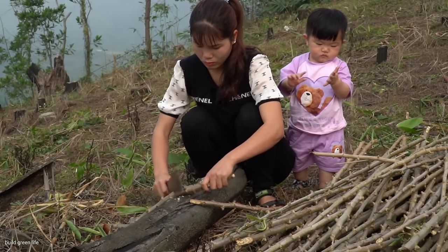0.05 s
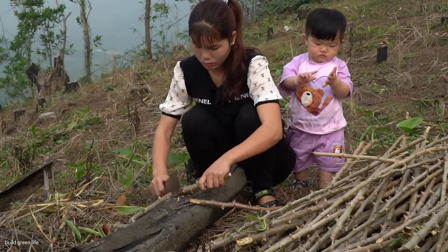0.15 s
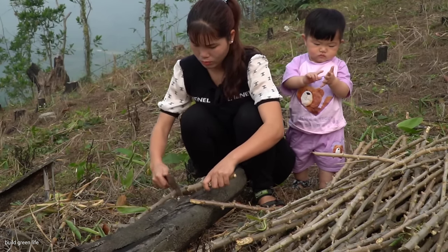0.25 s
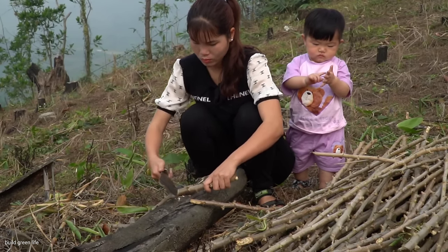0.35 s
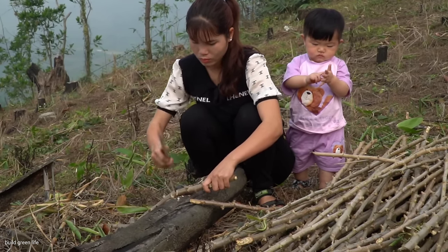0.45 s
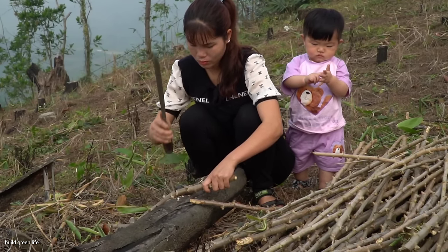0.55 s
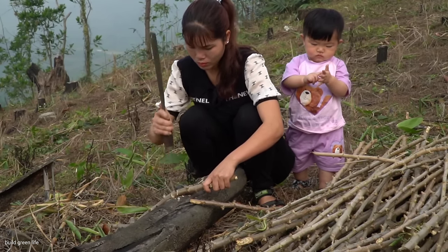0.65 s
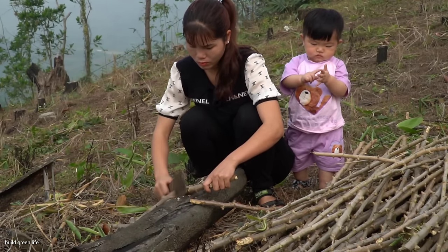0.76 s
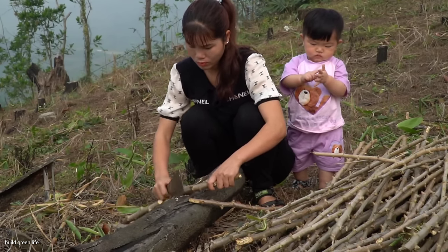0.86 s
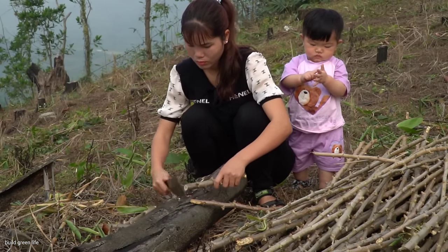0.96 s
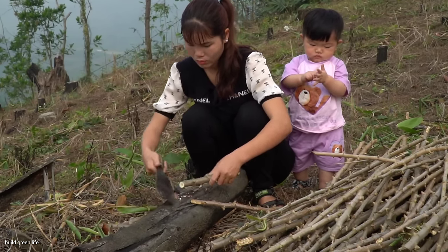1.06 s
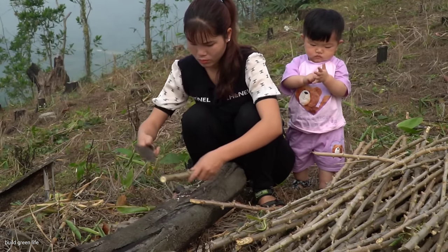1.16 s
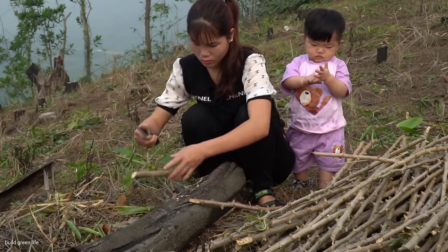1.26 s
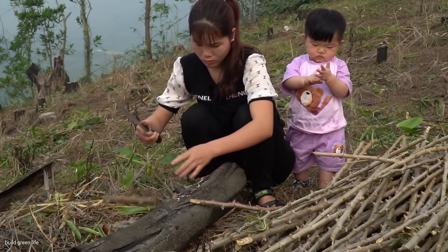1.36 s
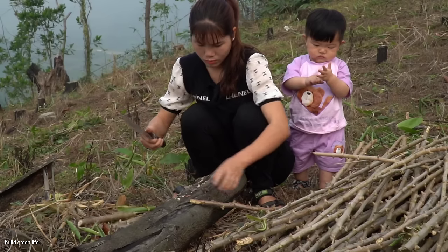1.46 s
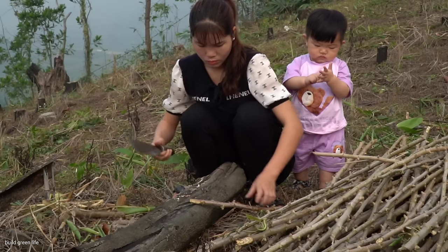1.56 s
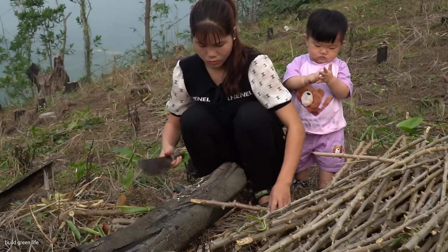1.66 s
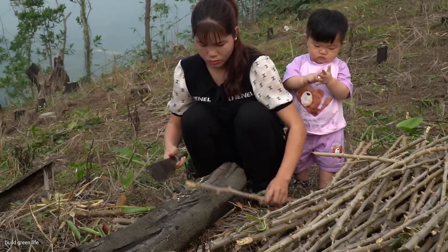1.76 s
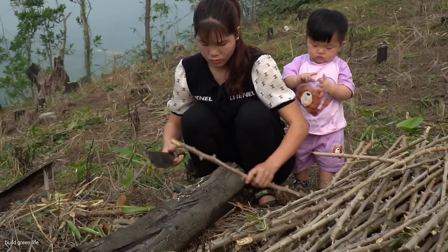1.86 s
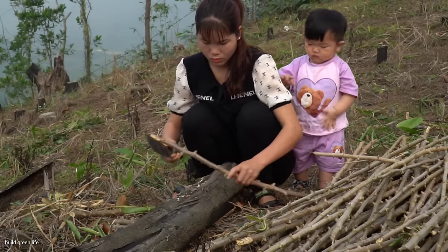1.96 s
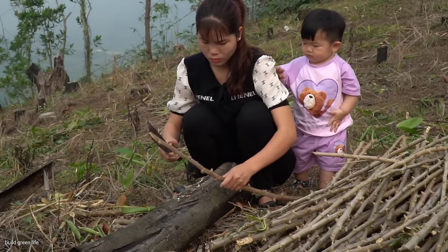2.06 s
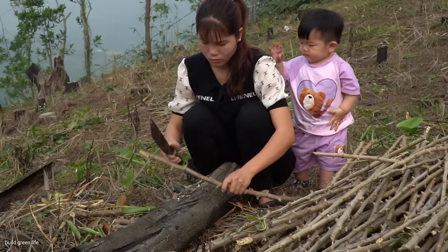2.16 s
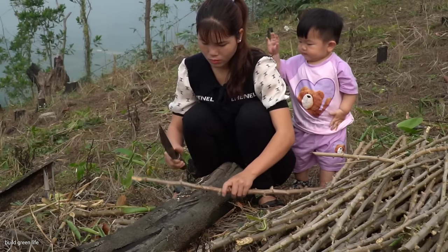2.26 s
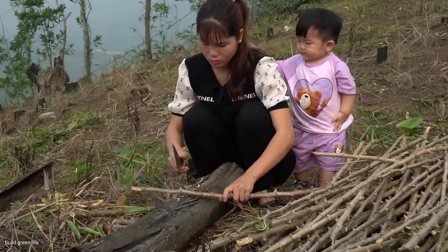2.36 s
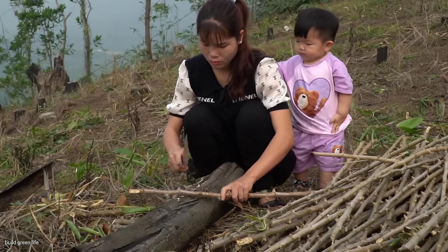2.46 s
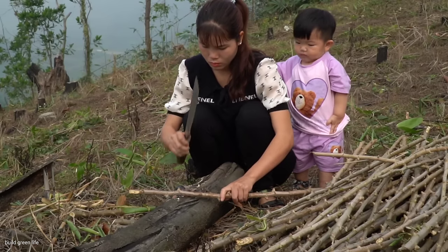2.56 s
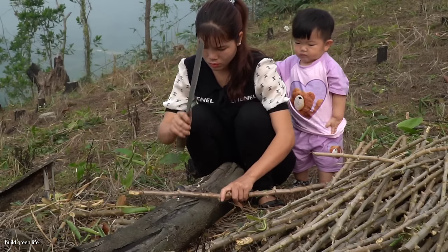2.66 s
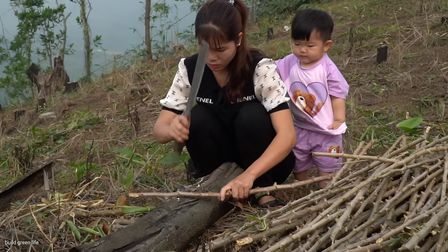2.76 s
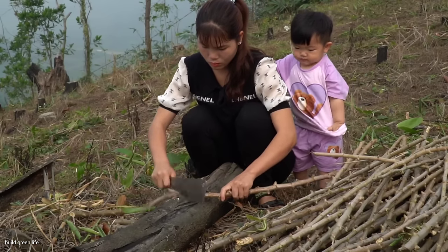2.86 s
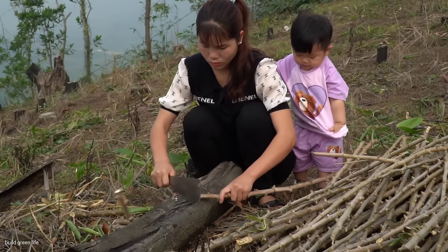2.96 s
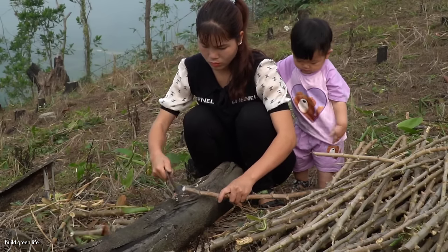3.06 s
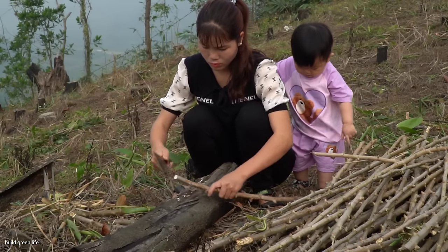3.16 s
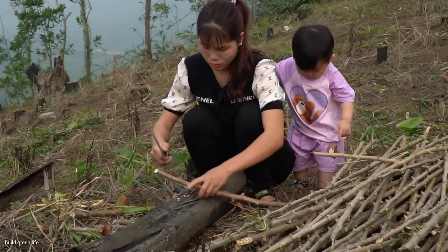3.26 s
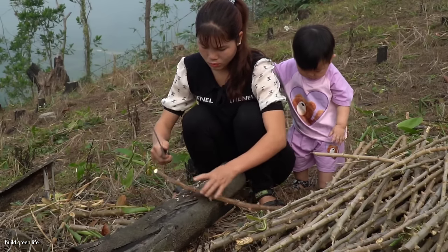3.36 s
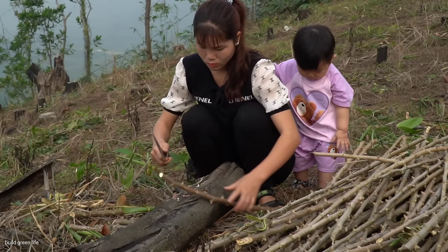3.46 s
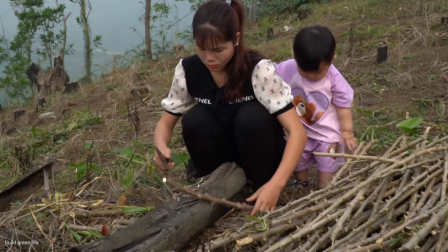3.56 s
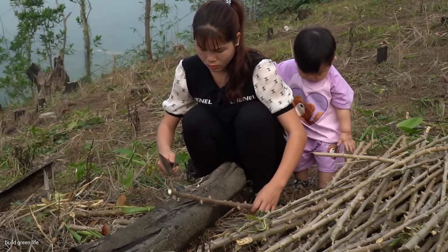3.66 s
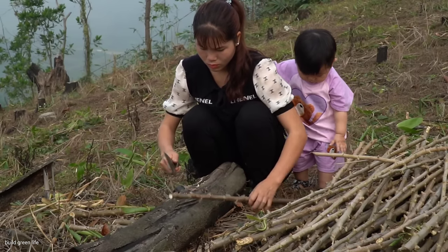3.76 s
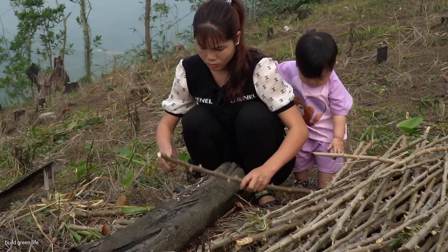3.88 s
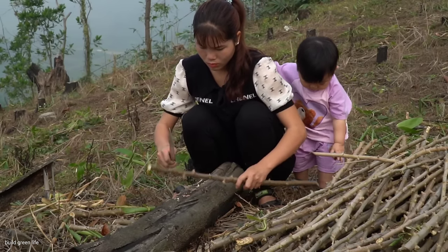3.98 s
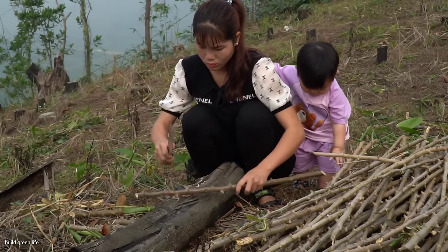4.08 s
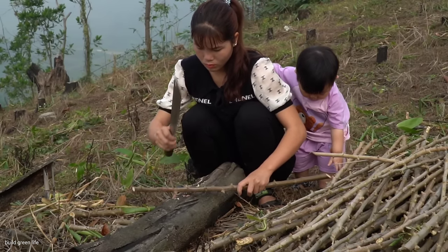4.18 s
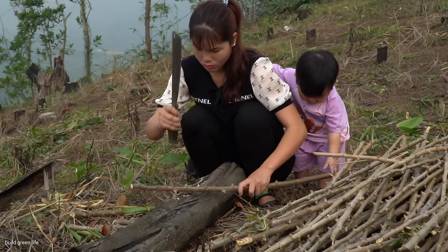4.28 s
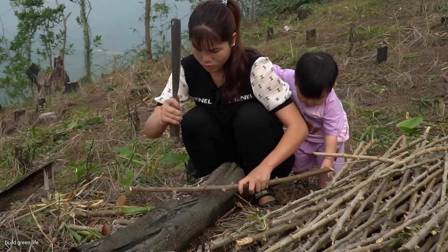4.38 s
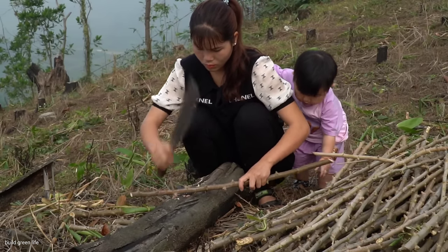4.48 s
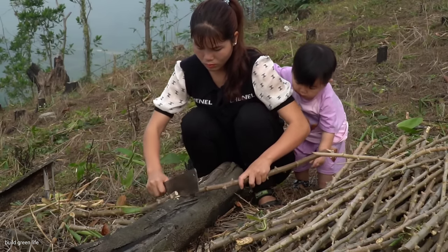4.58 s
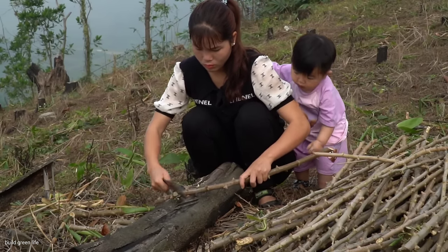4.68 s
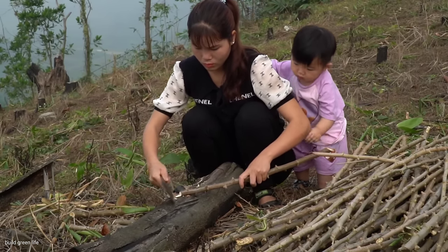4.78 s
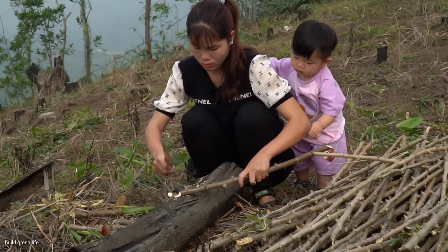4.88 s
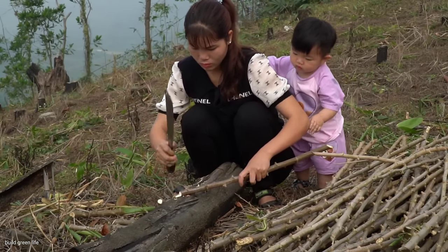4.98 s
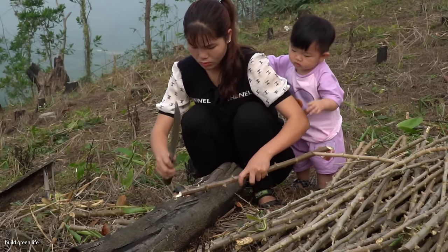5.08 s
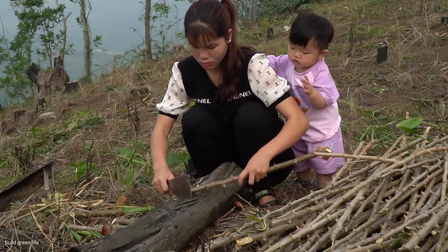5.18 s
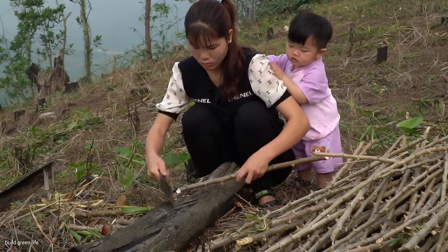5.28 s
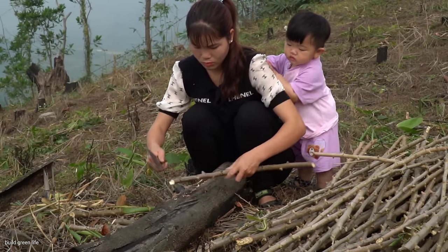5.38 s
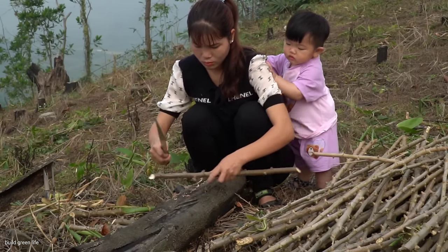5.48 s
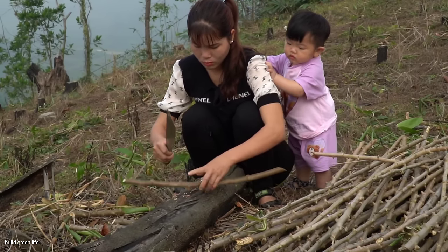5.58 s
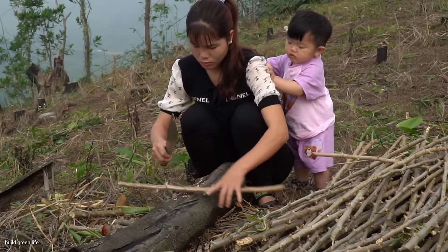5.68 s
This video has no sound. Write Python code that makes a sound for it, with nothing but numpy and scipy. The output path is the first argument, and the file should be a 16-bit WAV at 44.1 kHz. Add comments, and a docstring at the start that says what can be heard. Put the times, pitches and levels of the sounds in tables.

```python
"""An open hillside, where a machete chops woody stems on a log. Each stroke cracks through the stem,
rings the log and the blade, thuds through the soil and echoes off the slope. Between strokes bark tears,
wood knocks, a cut piece lands and dry litter rustles; a foot shifts at the end. Behind it all are air,
breeze, insects, birds, a low hum and a far engine revving. The microphone overloads on the strokes and
feeds only the left channel; the right carries faint hiss."""
import sys
import numpy as np
from scipy import signal
from scipy.fft import rfft, irfft, next_fast_len
from scipy.io import wavfile

SR = 44100
rng = np.random.default_rng(int(sys.argv[2]) if len(sys.argv) > 2 else 0)


def pcm_store(signal):
    """Save signal as 16-bit PCM."""
    levels = np.round(np.clip(np.atleast_2d(signal), -1, 1) * 32767)
    wavfile.write(sys.argv[1], SR, levels.astype(np.int16).T)


N = 252680
T = np.arange(N) / SR
AGE = T[:SR // 2]  # seconds since a hit


def undb(db):
    """Decibels to gain."""
    return 10 ** (np.asarray(db) / 20)


def add(track, start_s, sound):
    """Mix a sound in at start_s."""
    start = max(int(start_s * SR), 0)
    track[start:start + len(sound)] += sound[:max(N - start, 0)]


def spectral(x, gain):
    """Filter by a gain that is a function of frequency."""
    size = next_fast_len(len(x), real=True)
    return irfft(rfft(x, size) * gain(np.fft.rfftfreq(size, 1 / SR)), size)[:len(x)]


def equalise(x, eq):
    """Filter by a curve of (freq_hz, gain_db) points."""
    hz, db = np.transpose(eq)
    return spectral(x, lambda f: undb(np.interp(np.log(np.maximum(f, 1)), np.log(hz), db)))


def noise(eq, size=len(AGE)):
    """Coloured noise of rms 1."""
    x = equalise(rng.standard_normal(size), eq)
    return x / x.std()


def drift(rate_hz, size=len(AGE)):
    """Smooth random modulation of rms 1."""
    x = spectral(rng.standard_normal(size), lambda f: np.exp(-(f / rate_hz) ** 2))
    return x / np.sqrt(np.mean(x ** 2))


def crackle(eq, spread_db, rate_hz):
    """Noise broken into grains of uneven strength."""
    x = noise(eq) * undb(spread_db * np.clip(drift(rate_hz), -2, 2))
    return x / x.std()


def burst(rise_s, hold_s, t60_s):
    """Envelope that rises, holds and dies away."""
    return (1 - np.exp(-AGE / rise_s)) * np.exp(-np.log(1000) * np.maximum(AGE - hold_s, 0) / t60_s)


def ring(modes, pitch=1, length=1, scatter=0.0042):
    """Damped modes, each swelling to its peak as the vibration spreads; no two hits ring quite alike."""
    out = 0
    for hz, db, peak_s, t60_s in modes:
        decay_s = length * t60_s / np.log(1000)
        swell = np.exp((peak_s * np.log((AGE + 1 / SR) / peak_s) + peak_s - AGE) / decay_s)
        detuned_hz = hz * pitch * (1 + scatter * rng.standard_normal())
        out = out + undb(db) * swell * np.sin(2 * np.pi * detuned_hz * AGE)
    return out


# Tone of the open air: freq_hz, gain_db
AIR_EQ = [(25, -18), (50, -19), (70, 4.5), (150, 4.5), (300, -1.5), (600, -3), (950, -3), (1400, -9.5),
          (2500, -10.5), (3800, -13), (5200, -15), (7000, -20.5), (10000, -22), (16000, -28.5)]
# Fader ride on the air's midrange: time_s, level_db
AIR_RIDE = [(0.0, -49), (0.38, -51), (3.65, -52), (4.43, -54), (4.74, -51), (5.73, -50)]
# Partials of the low hum: pitch_hz, level_db
HUM_PARTIALS = [(49, -39), (106, -50.5), (212, -54), (265, -57.5)]

def hillside():
    """The bed: open air, a chorus of insects, a low hum and the breeze pressing on the microphone."""
    full_band_db = 10  # the whole band stands this far above its midrange
    air = noise(AIR_EQ, N) * undb(full_band_db + np.interp(T, *np.transpose(AIR_RIDE)) + 0.92 * drift(1.7, N))
    insect_hz, width_hz = 4514, 690
    chorus = drift(width_hz / 2, N) + 1j * drift(width_hz / 2, N)
    insects = np.real(chorus * np.exp(2j * np.pi * insect_hz * T)) * undb(-50.5 + 2.2 * drift(40, N))
    hum = sum(undb(db + 4.2 * drift(1.9, N)) * np.sin(2 * np.pi * hz * T) for hz, db in HUM_PARTIALS)
    breeze = noise([(1, -12.5), (4, -1.5), (8, -5), (16, -15), (30, -27.5), (80, -49), (400, -100)], N)
    gusts = undb(-23 + 2 * drift(1.3, N))
    return air + insects + hum + breeze * gusts


# Rev curve of the far engine: time_s, firing_hz
ENGINE_REVS = [(0.0, 145.4), (0.38, 115.1), (0.56, 79.1), (0.78, 121.8), (1.07, 85.5), (1.29, 77.4),
               (1.5, 104.8), (1.76, 108), (1.95, 77.5), (2.25, 111.6), (2.46, 84.3), (2.66, 80.65),
               (2.92, 109.1), (3.09, 107.7), (3.22, 76.6), (3.43, 78), (3.75, 119.0), (3.91, 87.0),
               (4.23, 75.9), (4.56, 101.4), (5.06, 97.3), (5.73, 137.6)]

def engine():
    """A far engine grows louder as it revs, up to full power; only its lowest harmonics carry."""
    full_power_hz, db_per_octave = 106.3, 16.5
    firing_hz = np.interp(T, *np.transpose(ENGINE_REVS))
    level_db = -41.5 + db_per_octave * np.minimum(np.log2(firing_hz / full_power_hz), 0)
    cycles = np.cumsum(firing_hz * (1 + 0.014 * drift(21.4, N))) / SR
    drone = sum(undb(db + 2.83 * drift(15.5, N)) * np.sin(2 * np.pi * k * cycles)
                for k, db in enumerate([2.5, -8.5, -15, -23], 1))
    return undb(level_db) * drone


# Crunch of the edge going in: freq_hz, gain_db
CRACK_EQ = [(60, -12), (230, -41), (480, 0), (800, -3), (1050, -3), (1500, -0.5), (2100, 0.5), (2600, -13),
            (5000, -16), (16000, -19)]
# Choked ring of a stem pinned on the log: pitch_hz, level_db, peak_s, t60_s
PINNED_STEM_MODES = [(571, -11.5, 0.0027, 0.012), (970, 0, 0.00061, 0.02), (1059, -9, 0.00074, 0.037),
                     (1375, -8, 0.00091, 0.035), (1567, -10, 0.00058, 0.022), (2030, -10.5, .0008, 0.022)]

def stem_crack(cut_s):
    """The edge crushes through the pinned stem, which rings briefly."""
    crush = noise(CRACK_EQ) * burst(0.0001, cut_s, 0.012)
    return undb(-2.5) * (crush + ring(PINNED_STEM_MODES, scatter=0.0078))


# Machete hits: start_s, log_db, log_pitch_ratio, log_length_ratio, crack_db, cut_s,
# splinter_db, splinter_t60_s, hollow_delay_s, rock_db, rock_delay_s, blade_db
STROKES = [(0.1230, -5, 1.005, 1.55, -2.5, 0.00094, -19, .05, .013, -23, 0.043, -47),
           (0.8494, -1.5, 0.96, 1.04, -2, 0.0013, -8, .01, .013, -12, 0.046, -60),
           (2.9432, -4, 1.024, 0.95, -3, 0.0039, -13.5, .022, .015, -26, 0.039, -41),
           (4.609, -9.5, 0.96, 0.97, -5.5, 0.0033, -7.5, 0.023, 0.00687, -30, 0.042, -37),
           (5.2412, -4, 0.97, .9, -8.5, 0.0014, -13.5, 0.016, 0.0016, -10.5, 0.019, -27)]
# Ringing layers of a hit: pitch_hz, level_db, peak_s, t60_s
LOG_MODES = [(516, -15.5, 0.0026, 0.021), (587, -8, 0.0019, 0.02), (644, -2, 0.0016, 0.052),
             (669.6, -13, 0.013, 0.054)]  # woody knock
HOLLOW_MODES = [(313.4, 0, 0.017, 0.068), (341.8, -17, 0.035, 0.1), (306.8, -20, 0.039, 0.21),
                (274, -19, 0.0079, 0.057), (381, -19, 0.014, 0.049)]  # the log's deep body
SOIL_MODES = [(46, 1, 0.1, 0.081), (47.83, -14.5, .28, 0.054)]  # sub thud
BLADE_MODES = [(1044, 2.5, 0.0024, 0.13), (2710, -11, .002, 0.14), (3040, -7.5, 0.0013, 0.14),
               (6900, -27, .001, .12), (9380, 5, 0.00069, 0.076), (9620, -16, .001, .12)]  # metallic ring
# Bright edge of splitting fibres: freq_hz, gain_db
FIBRE_EQ = [(200, -47), (1000, -6.5), (2100, 1.5), (3600, -7.5), (5400, 3.5), (7200, 0.5), (9500, 3.5),
            (13000, -5.5), (16000, -9)]

def chops():
    """The edge cuts the stem, then strikes the log; the slope echoes and the soil carries a late thud."""
    out = np.zeros(N)
    for (start_s, log_db, pitch, length, crack_db, cut_s,
         splinter_db, splinter_t60_s, hollow_delay_s, rock_db, rock_delay_s, blade_db) in STROKES:
        crack = undb(crack_db) * stem_crack(cut_s)
        grains = crackle(FIBRE_EQ, spread_db=6.5, rate_hz=3300)
        splinters = undb(splinter_db) * grains * burst(0.0002, cut_s, splinter_t60_s)
        # the log sounds only once the edge is through
        knock = undb(log_db) * np.pad(ring(LOG_MODES, pitch, length), (int(cut_s * SR), 0))[:len(AGE)]
        blow = crack + splinters + knock
        # the blade chatters in the cut as it rings
        blade = undb(blade_db + 5.9 * drift(160)) * ring(BLADE_MODES, scatter=0.00042)
        thud = undb(crack_db - 7) * ring(SOIL_MODES)
        add(out, start_s, blow + blade + thud)
        add(out, start_s, undb(-16.5) * signal.fftconvolve(blow, slope_echo()))
        # the hollow note builds after the blow, and again as the log rocks back
        add(out, start_s + hollow_delay_s, undb(-12 + 0.5 * log_db) * ring(HOLLOW_MODES, scatter=0.002))
        add(out, start_s + rock_delay_s, undb(rock_db) * ring(HOLLOW_MODES, pitch=1.02, scatter=0.0017))
        # the edge nicks the bark just before it bites
        add(out, start_s - .0012, undb(-16) * noise(FIBRE_EQ) * burst(0.00021, 0.0018, 0.0027))
    return out


# Tone of the echo return: freq_hz, gain_db
ECHO_EQ = [(100, -8), (350, -19), (650, -2.5), (1000, -2), (2000, -2.5), (2500, 0.5), (3100, 3.5),
           (4200, -12), (7000, -3.5), (16000, -11)]

def slope_echo():
    """Impulse response of the slope: the ground close by, the trunks a little later, a faint tail."""
    ground = burst(0.0043, 0.055, 0.15)
    trunks = undb(-3) * np.exp(-((AGE - .044) / 0.0038) ** 2)
    tail = undb(-8) * burst(.02, 0.084, 0.75)
    echoes = rng.standard_normal(len(AGE)) * (ground + trunks + tail)
    return equalise(echoes / np.linalg.norm(echoes), ECHO_EQ)


def snap():
    """One fibre breaks with a bright click."""
    return crackle(FIBRE_EQ, spread_db=-0.5, rate_hz=3300) * burst(0.00012, 0.00064, 0.018)


# Snaps of bark and twigs: start_s, level_db
BARK_SNAPS = [(0.162, -33), (0.3295, -29), (0.3358, -11.5), (0.3493, -18.5), (0.3594, -18), (0.399, -24.5),
              (1.4898, -29.5), (2.294, -38.5), (2.8657, -30.5), (3.1246, -31.5), (3.185, -29),
              (3.644, -26.5), (4.638, -18.5), (4.665, -26), (4.7325, -30), (4.9453, -36), (5.4506, -34.5)]

def tearing_bark():
    """Bark tears in single snaps, each letting two weaker fibres go just after it."""
    out = np.zeros(N)
    for start_s, db in BARK_SNAPS:
        add(out, start_s, undb(db) * snap())
        for delay_s in rng.uniform(0, .024, size=2):
            add(out, start_s + delay_s, undb(db - 14.5) * snap())
    return out


# Wood bumping log and ground: start_s, level_db, lowpass_hz
WOOD_KNOCKS = [(0.3607, -26.5, 1200), (0.4133, -27.5, 590), (1.103, -23.5, 2440), (1.4911, -23.5, 1130),
               (1.8031, -34, 2600), (2.2294, -36, 1500), (2.424, -32.5, 1000), (3.3442, -27, 3200),
               (3.3884, -22, 3000), (3.4933, -37, 4900), (4.1421, -35.5, 680), (4.811, -31, 2198),
               (4.944, -33, 2197), (5.068, -30.5, 1810), (5.3625, -22.5, 2000)]
# Scuff of the contact: freq_hz, gain_db
SCUFF_EQ = [(60, -32), (130, 3), (450, -2), (800, -5), (1300, -7.5), (3200, -5.5), (5000, -21),
            (16000, -28)]

def knocks():
    """Stems knock on the log; a softer contact is duller and wakes more of the hollow note."""
    out = np.zeros(N)
    for start_s, db, lowpass_hz in WOOD_KNOCKS:
        scuff = noise(SCUFF_EQ) * burst(0.00029, 0.0058, .05)
        log = undb(-5.5) * ring(LOG_MODES, pitch=0.97, scatter=0.064)
        stem = undb(-5) * ring(PINNED_STEM_MODES, pitch=1.2, scatter=0.1)
        contact = signal.sosfilt(signal.butter(2, lowpass_hz, fs=SR, output="sos"), scuff + log + stem)
        add(out, start_s, undb(db) * contact * scuff.std() / contact.std())
        hollow_db = db - 6.5 - 6.5 * np.log2(lowpass_hz / 1000)
        add(out, start_s, undb(hollow_db) * ring(HOLLOW_MODES, pitch=1.06))
    return out


def whistle(length_s, start_hz, end_hz, flutter_hz):
    """One gliding bird note, its pitch fluttering."""
    size = int(length_s * SR)
    hz = np.geomspace(start_hz, end_hz, size) + flutter_hz * drift(590, size)
    return np.sin(2 * np.pi * np.cumsum(hz) / SR) * signal.windows.tukey(size, .5)


# One bird's two falling notes: delay_s, length_s, start_hz, end_hz, gain_db
BIRD_PHRASE = [(0, 0.03, 7020, 4750, -6), (0.059, 0.038, 5206, 3395, -1)]
# Thin far calls: start_s, start_hz, end_hz, level_db
THIN_CALLS = [(2.295, 6300, 4886, -49), (2.33, 5680, 6600, -53), (2.619, 6180, 5270, -48.5),
              (3.294, 6440, 5120, -48.5), (5.535, 5500, 6990, -51)]

def birds():
    """A repeated phrase, slowing a little, stray calls and a flock, all smeared by the trees between."""
    out = np.zeros(N)
    first_s, period_s, slowing_s = .497, .167, .0008
    for k in range(10):
        start_s = first_s + period_s * k + slowing_s * k ** 2
        for delay_s, length_s, start_hz, end_hz, db in BIRD_PHRASE:
            note = whistle(length_s, start_hz, end_hz, flutter_hz=80.4)
            add(out, start_s + delay_s, undb(db - 42) * note)
    for start_s, start_hz, end_hz, db in THIN_CALLS:
        add(out, start_s, undb(db) * whistle(0.067, start_hz, end_hz, flutter_hz=328))
    # the flock chatters further off
    for start_s, hz, glide in rng.uniform((.4, 3400, .6), (2.45, 6700, 1), size=(70, 3)):
        add(out, start_s, undb(-52) * whistle(.05, hz, hz * glide, flutter_hz=160))
    trees = rng.standard_normal(len(AGE)) * burst(.002, .008, .35)
    return out + signal.fftconvolve(out, trees / np.linalg.norm(trees))[:N]


def twig_ticks():
    """Twigs tick faintly under hands and feet."""
    out = np.zeros(N)
    for start_s, strength in rng.uniform((1.2, .5), (5.4, 1.5), size=(10, 2)):
        add(out, start_s, undb(-40.5) * strength * snap())
    return out


# Clack of a loose cut stem: pitch_hz, level_db, peak_s, t60_s
LOOSE_STEM_MODES = [(970, 0.5, 0.003, 0.12), (1180, -2.5, 0.0014, 0.019), (1704, -8, 0.00087, 0.08),
                    (1744, -2.5, 0.0009, 0.027), (2237, -10, .001, 0.1), (2600, -20, .001, .05)]

def landing():
    """A cut piece bumps onto the pile and rings."""
    out = np.zeros(N)
    bump_eq = [(50, 6), (100, 5), (250, 6), (500, -15), (2000, -2), (3500, -17), (16000, -38)]
    bump = undb(-3.5) * noise(bump_eq) * burst(0.0007, 0.0018, 0.063)
    add(out, start_s=1.5029, sound=undb(-13.5) * (ring(LOOSE_STEM_MODES, scatter=0.0016) + bump))
    return out


# Drags through the litter: start_s, length_s, level_db
LITTER_DRAGS = [(1.504, 0.13, -39.5), (1.708, 0.049, -34), (3.13, 0.045, -34), (3.323, 0.066, -39.5),
                (3.588, 0.091, -34.5), (4.605, .045, -35.5), (4.782, 0.023, -38), (4.925, 0.038, -46)]
# Tone of the dry rustle: freq_hz, gain_db
LITTER_EQ = [(100, -6), (500, 3), (2000, 1), (4000, -1.5), (7000, -7), (10000, -1.5), (13500, -5.5),
             (16000, -11)]

def rustles():
    """Stems drag through dry litter, which gives way in dense grains and settles; twigs crack in it."""
    out = np.zeros(N)
    for start_s, length_s, db in LITTER_DRAGS:
        drag = burst(0.0025, length_s, 0.14)
        settling = undb(-14) * burst(length_s, length_s + 0.19, 0.14)
        grains = crackle(LITTER_EQ, spread_db=5, rate_hz=450)
        add(out, start_s, undb(db) * grains * np.hypot(drag, settling))
        for delay_s in rng.uniform(0, length_s, size=3):
            add(out, start_s + delay_s, undb(db + 0.5) * snap())
    return out


def footstep():
    """A foot shifts on the soil with a sub-bass thump."""
    out = np.zeros(N)
    thump = ring([(24.02, -3, .11, 0.064), (43.35, -3, 0.084, 0.093)])
    add(out, start_s=5.61, sound=undb(-7) * thump)
    return out


def scene():
    """All sources at one microphone on the left channel; the right one carries only faint hiss."""
    foley = chops() + knocks() + landing() + footstep() + tearing_bark() + twig_ticks() + rustles()
    ambience = birds() + engine() + hillside()
    hiss = undb(-56) * noise([(30, 20), (100, 8.5), (300, 4), (2000, 1), (16000, -1)], N)
    return np.array([foley + ambience, hiss])


def record(dry):
    """The overloaded input flattens the loudest peaks and cuts the top."""
    soft_clipped = dry / (1 + dry ** 6) ** (1 / 6)
    lowpass_hz = 15500
    return signal.sosfilt(signal.ellip(8, .2, 70, lowpass_hz, fs=SR, output="sos"), soft_clipped)


dry = scene()
out = record(dry)
pcm_store(out)
```